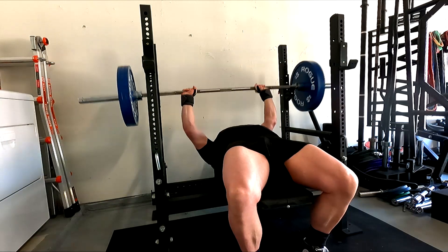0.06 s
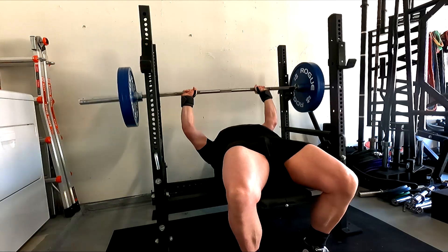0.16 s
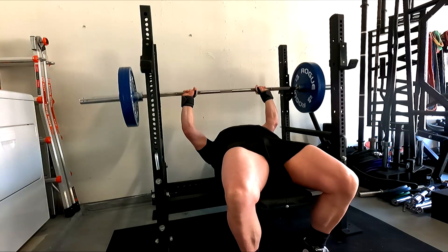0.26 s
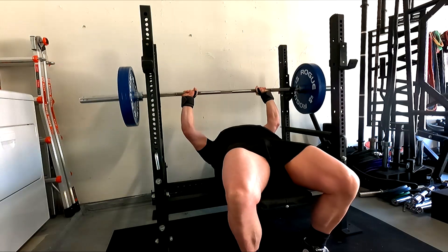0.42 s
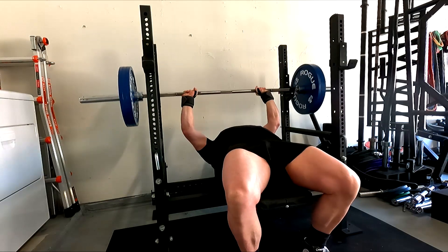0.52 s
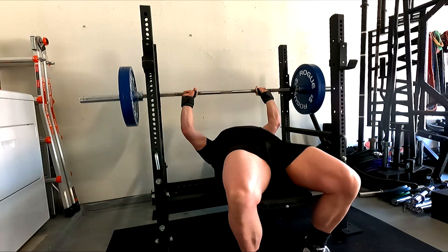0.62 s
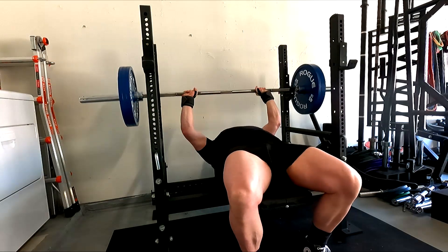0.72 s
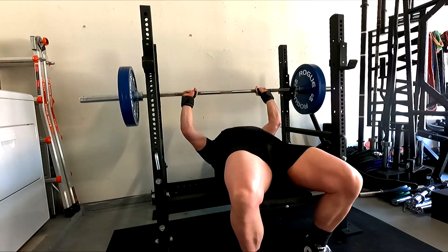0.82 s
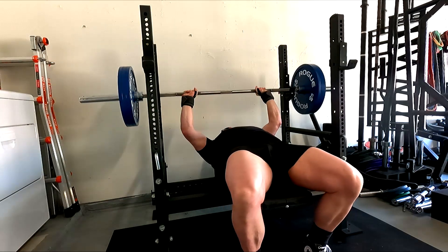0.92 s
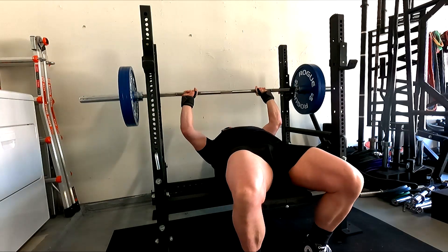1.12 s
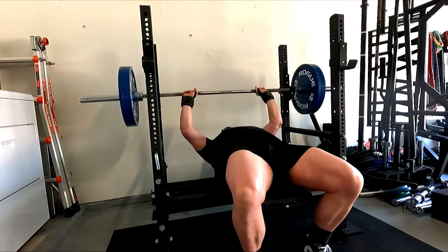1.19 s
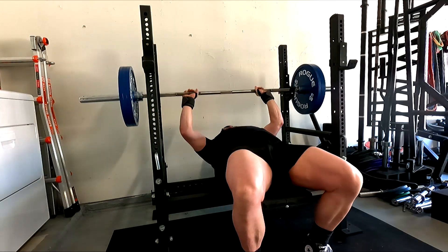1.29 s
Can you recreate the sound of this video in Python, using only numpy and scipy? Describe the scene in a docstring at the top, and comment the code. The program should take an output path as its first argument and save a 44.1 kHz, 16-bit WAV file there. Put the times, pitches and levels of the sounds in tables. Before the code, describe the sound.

A loaded barbell clatters hard against a steel rack, rattling and ringing, then fades in a gym

```python
"""A loaded barbell is lifted out of a steel rack in a small gym, over low air noise that slowly settles.
The bar first creaks in its hooks as band-like wavering tones, and the rack gives a soft low thud.
Then it knocks and scrapes: bursts of tiny contacts rattle the plates, sine modes ring, the rack booms
in low noise and sines, the sliding bar sings, and two thin squeals stand out.
The blows thin out and soften, and decaying noise reflections carry the clatter away."""
import sys
import numpy as np
from scipy import signal
from scipy.fft import rfft, irfft
from scipy.io import wavfile

SR = 44100
rng = np.random.default_rng(int(sys.argv[2]) if len(sys.argv) > 2 else 0)


def waveform_to_disk(signal):
    """Save audio, clipped to [-1, 1], as 16-bit WAV at the path in sys.argv[1]."""
    frames = np.transpose(np.atleast_2d(signal))
    scaled = np.clip(frames, -1, 1) * 32767
    samples = np.round(scaled).astype(np.int16)
    wavfile.write(sys.argv[1], SR, samples)


N = 59535
T = np.arange(N) / SR
HZ = np.fft.rfftfreq(2 * N, 1 / SR)

# Steel striking steel. Each row: start in seconds, relative level in dB, treble tilt in dB per octave,
# time constant of the rattle in seconds.
BLOWS = [(.2315, -40, -1.5, 0.032), (0.2412, -43, 4, 0.003), (.265, -45.5, 2, 0.01),
         (0.2876, -44.5, 4.5, 0.0075), (.325, -47.5, 1, 0.011), (.363, -47, -3, 0.06),
         (.41, -45.5, 1, 0.042), (0.471, -45.5, -3.5, 0.043), (.514, -45, 1, 0.014), (.545, -46, -2, 0.036),
         (.575, -48.5, 4, 0.011), (.603, -53, 0.5, .014), (.655, -50.5, -4.5, 0.025),
         (.6935, -49.5, -6, 0.011), (.722, -52, -6.5, 0.0079), (.758, -57, -4.5, 0.018),
         (.81, -63, -12, 0.039), (.965, -67, -8, 0.023)]


def amp(db):
    """Decibels to gain."""
    return 10 ** (np.asarray(db) / 20)


def unit(x):
    """Scales a sound to energy one."""
    return x / np.sqrt(np.sum(x ** 2) + 1e-20)


def read(points, hz):
    """Reads a table of frequency and value on a log-frequency axis."""
    f, value = np.transpose(points)
    return np.interp(np.log(hz + 1), np.log(f + 1), value)


def add(mix, start_s, sound):
    """Mixes a sound in at a time."""
    part = mix[max(round(start_s * SR), 0):]
    part += sound[:len(part)]


def convolve(x, response):
    """Plays x through a response."""
    return signal.fftconvolve(x, response)[:N]


def colour(x, gain_db):
    """Causal minimum-phase filter with the given gain at each frequency, by folding the cepstrum."""
    cepstrum = irfft(np.log(amp(gain_db)))
    cepstrum[1:N] *= 2
    cepstrum[N + 1:] = 0
    response = np.exp(rfft(cepstrum))
    return irfft(rfft(x, 2 * N) * response)[:N]


def noise(gain_db):
    """Steady noise of unit RMS level with a given spectrum."""
    spectrum = rfft(rng.standard_normal(2 * N)) * amp(gain_db)
    return unit(irfft(spectrum)[:N]) * np.sqrt(N)


def drift(rate_hz):
    """Random wander of unit RMS, mostly slower than the given rate."""
    return noise(-20 * np.log10(1 + (HZ / rate_hz) ** 4))


def dying(t60):
    """Exponential decay by 60 dB in t60 seconds."""
    return np.exp(-np.log(1000) * T / t60)


def struck(x):
    """Scales a hit to the energy of unit level held for a twentieth of a second."""
    return unit(x) * np.sqrt(SR / 20)


def tone(hz, wander_hz):
    """A sine of unit RMS level whose pitch wanders."""
    turns = np.cumsum(hz + wander_hz * drift(78)) / SR
    return np.sqrt(2) * np.sin(2 * np.pi * (turns + rng.random()))


def treble(hz):
    """Octaves above the 2 kHz pivot of a blow's brightness, held level below 900 and above 8360 Hz."""
    return np.log2(np.clip(hz, 900, 8360) / 2000)


def air():
    """Still air of the gym: low room noise that settles slowly."""
    # Each row: frequency in Hz, relative level in dB per Hz.
    air_spectrum = [(20, -3), (60, 7), (130, 4), (230, 1.5), (320, -8.5), (480, -5.5), (750, -8.5),
                    (1030, -5), (1400, -16), (1900, -20), (2700, -38), (4000, -44), (8000, -49),
                    (14000, -55)]
    start_db, end_db = -62.5, -71.5
    return noise(read(air_spectrum, HZ)) * amp(np.linspace(start_db, end_db, N))


def room(x):
    """Diffuse reflections, each band dying at its own speed, through four tails in turn."""
    # Decay of the bare room. Each row: frequency in Hz, t60 in seconds.
    room_decay = [(100, 0.49), (400, 1), (1200, 0.93), (2500, 0.67), (5000, 0.62), (8000, 0.56),
                  (13000, 0.6)]
    turn_hz, build_s = 4, 0.0067
    hz, t, bands = signal.stft(rng.standard_normal((4, N)), SR, nperseg=256)
    fade = amp(-60 * t / read(room_decay, hz)[:, None])
    tails = signal.istft(bands * fade, SR, nperseg=256)[1][:, :N]
    build = 1 - np.exp(-T / build_s)
    out = np.zeros(N)
    # the sound is passed round four different tails, a quarter turn apart
    for k, tail in enumerate(tails):
        share = np.maximum(np.cos(2 * np.pi * turn_hz * T + k * np.pi / 2), 0)
        out += convolve(x * share, unit(tail * build))
    return out


def rub():
    """A soft creak in a few unsteady resonances as the bar takes the strain in the hooks."""
    # Each row: pitch in Hz, pitch wander in Hz RMS, level in dB.
    creaks = [(216.5, 12, -61), (406.4, 33, -73.5), (532, 17, -70), (1046, 14, -68.5), (1340, 110, -73.5),
              (1790, 160, -76.5)]
    start_s, end_s, edge_s = .095, .22, .018
    fade_in = np.clip((T - start_s) / edge_s, 0, 1)
    fade_out = np.clip((end_s - T) / edge_s, 0, 1)
    return fade_in * fade_out * sum(amp(db) * tone(hz, wander_hz) for hz, wander_hz, db in creaks)


def thuds():
    """The weight booms one low mode of the rack and shakes the others; a weaker shudder lingers."""
    # Weight landing on the rack. Each row: start in seconds, relative level in dB, boom pitch in Hz.
    landings = [(0.102, -59.5, 224.5), (0.233, -40.5, 185.6), (0.273, -43, 178.2), (0.311, -49, 76),
                (0.359, -50.5, 173.8), (0.424, -57, 167), (.499, -49, 118.1), (0.556, -51, 130.6),
                (0.602, -53, 197), (0.647, -49.5, 103.3), (0.696, -48, 235.8), (0.764, -55, 168.4),
                (1.041, -66, 128.5)]
    # The rack's low body. Each row: frequency in Hz, relative level in dB per Hz.
    frame_spectrum = [(25, -21.5), (50, -11.5), (70, -1.5), (120, 0.5), (185, -0.5), (235, -0.5),
                      (320, -11), (480, -12), (800, -15.5), (2000, -64)]
    shake_db, shake_t60 = -5.5, 0.23
    shudder_db, shudder_t60 = -9.5, 0.37  # against the first shake
    boom_db, boom_t60 = -5, .2
    rise_s = 0.0074
    frame_db, rise = read(frame_spectrum, HZ), np.minimum(T / rise_s, 1)
    level = dying(shake_t60) + amp(shudder_db) * dying(shudder_t60)
    out = np.zeros(N)
    for start_s, db, hz in landings:
        shake = struck(noise(frame_db) * level * rise)
        boom = struck(np.sin(2 * np.pi * hz * T) * dying(boom_t60) * rise)
        add(out, start_s, amp(db + shake_db) * shake + amp(db + boom_db) * boom)
    return out


def squeals():
    """A dry spot sets off a thin, high mode of steel on steel, which then rings out."""
    # Each row: start in seconds, time before the decay in seconds, pitch in Hz, level in dB.
    dry_spots = [(.415, 0.013, 7440, -63.5), (.605, 0.012, 7420, -68.5)]
    rise_s, ring_t60 = 0.0099, .36
    waver, flutter_db = 0.0013, 3.5  # waver is a fraction of the pitch
    out = np.zeros(N)
    for start_s, length_s, hz, db in dry_spots:
        ring_out = np.exp(-np.log(1000) * np.maximum(T - length_s, 0) / ring_t60)
        level = np.minimum(T / rise_s, 1) * ring_out
        turns = np.cumsum(hz + hz * waver * drift(60)) / SR
        flutter = amp(db + flutter_db * drift(60))
        add(out, start_s, np.sqrt(2) * level * flutter * np.sin(2 * np.pi * turns))
    return out


def singing():
    """Sliding in the hooks keeps one mode of the bar going, swelling with the pressure."""
    # Points along the slide. Each row: time in seconds, pitch in Hz, level in dB.
    slide = [(0.228, 1540, -61), (.245, 1540, -43), (.3, 1530, -55), (.34, 1540, -56.5), (.38, 1544, -48),
             (.44, 1544, -47), (.5, 1545, -48.5), (0.569, 1546, -55.5), (.62, 1546, -62),
             (0.701, 1517, -59), (0.737, 1516, -50), (0.769, 1517, -57), (0.828, 1519, -58.5),
             (0.921, 1522, -73.5), (.99, 1527, -67.5), (1.038, 1527, -70.5), (1.11, 1527, -87),
             (1.25, 1530, -100)]
    wander_hz, flutter_db = 2.07, 2.4
    s, hz, db = np.transpose(slide)
    level = amp(np.interp(T, s, db) + flutter_db * drift(37)) * (T >= s[0])
    return level * tone(np.interp(T, s, hz), wander_hz)


def ring():
    """Every blow tops up the energy in the long modes of the bar and plates."""
    # Each row: pitch in Hz, relative level in dB, t60 in seconds.
    modes = [(1237, -6, .6), (1519, -9, .5), (1572, -1, .6), (1648, -4, .5), (1721, -5, .5), (1826, -6, .5),
             (1845, -7, .5), (1901, -7, .5), (1932, -3, .7), (2022, -6, .45), (2040, -6, .45),
             (2116, -6, .5), (2197, -7, .5), (2395, -8, .6), (2589, -12, .5), (3253, -12, .5),
             (3655, -14, .5), (4318, -9, .5), (4405, -13, .5), (4889, -12, .5), (5147, -16, .5),
             (5750, -18, .45), (6036, -16, .4), (6513, -18, .5), (7451, -21, .5)]
    modes_db, flutter_db = -13.5, 1.5
    rise_s = 0.024  # time constant of the onset
    out = np.zeros(N)
    for hz, mode_db, t60 in modes:
        energy = np.zeros(N)
        pulse = (dying(t60) * (1 - np.exp(-T / rise_s))) ** 2
        for start_s, db, tilt_db, _ in BLOWS:
            add(energy, start_s, amp(db + tilt_db * treble(hz)) ** 2 * pulse)
        flutter = amp(modes_db + mode_db + flutter_db * drift(5))
        out += np.sqrt(energy) * flutter * np.sin(2 * np.pi * (hz * T + rng.random()))
    return out


def clatter():
    """Each blow is a dying burst of tiny contacts that clanks the plates, with its own treble tilt."""
    # Dense, short ringing of the plates. Each row: frequency in Hz, relative level in dB per Hz.
    clank_spectrum = [(150, -12), (330, -11), (480, -9.5), (750, -6), (1050, -1), (1380, -0.5), (1650, 2.5),
                      (2200, -0.5), (2900, -8), (3900, -12.5), (4600, -10), (5600, -14), (7400, -22),
                      (8300, -31.5), (10000, -38.5), (12500, -41.5), (14000, -55.5)]
    clank_db, clank_t60 = -6.5, 0.085
    contacts_per_s, contact_spread_db = 1800, 3.5
    first_contact = .18  # against a burst of energy one
    seat_s = .004  # the burst swells over this time
    spectrum_db, octaves = read(clank_spectrum, HZ), treble(HZ)
    out = np.zeros(N)
    for start_s, db, tilt_db, rattle_s in BLOWS:
        hits = (rng.random(N) < contacts_per_s / SR) * rng.choice([-1, 1], N)
        contacts = hits * amp(contact_spread_db * rng.standard_normal(N))
        contacts = unit(contacts * np.exp(-T / rattle_s) * np.minimum(T / seat_s, 1) ** 2)
        contacts[0] += first_contact
        plate = unit(rng.standard_normal(N) * dying(clank_t60))
        plate[0] += 1  # the contact itself, ahead of the ringing
        clank = struck(colour(convolve(contacts, plate), spectrum_db))
        add(out, start_s, amp(db + clank_db) * colour(clank, tilt_db * octaves))
    return out


def scene():
    """Direct sound sits a little to the left; the reflections and air give the width."""
    # Side against middle. Each row: frequency in Hz, gain in dB.
    width = [(60, -32.5), (150, -38), (300, -24), (600, -13.5), (1500, -13.5), (3000, -9.5), (9000, -13),
             (13000, -10)]
    left_db = 2  # approximate tilt to the left in the treble
    steel, tones, low = clatter(), ring(), thuds()
    sing, friction = singing() + squeals(), rub()

    # sends into the room, in dB
    sent = amp(1) * steel + amp(-8.5) * tones + amp(-10.5) * low + amp(-15.5) * sing
    direct = steel + tones + low + sing + friction
    mid = direct + room(sent) + air()
    side = colour(room(direct + steel) + air(), read(width, HZ))

    # the lean to the left fades out below about 300 Hz
    lean_gain = (amp(left_db / 2) - 1) * HZ / (HZ + 300)
    lean = irfft(rfft(mid, 2 * N) * lean_gain)[:N]
    return np.array([mid + lean + side, mid - lean - side])


def record(dry):
    """A steep linear-phase low-pass closes the top of the band."""
    edge_hz = 13800
    lowpass = signal.firwin(511, edge_hz, window=("kaiser", 9), fs=SR)
    return signal.oaconvolve(dry, lowpass[None], "same")


dry = scene()
out = record(dry)
waveform_to_disk(out)
```